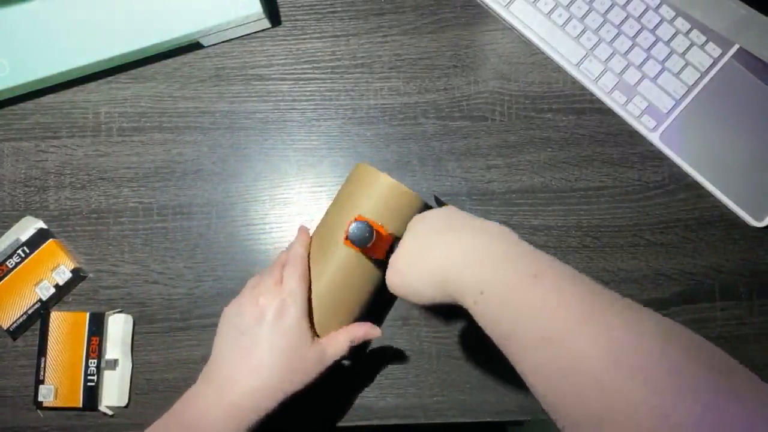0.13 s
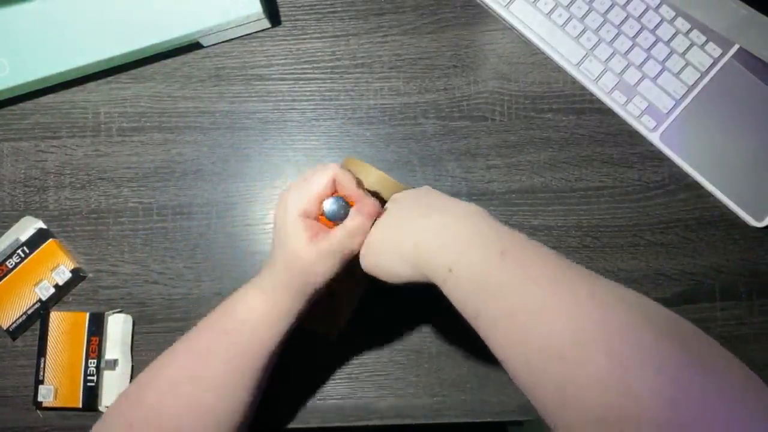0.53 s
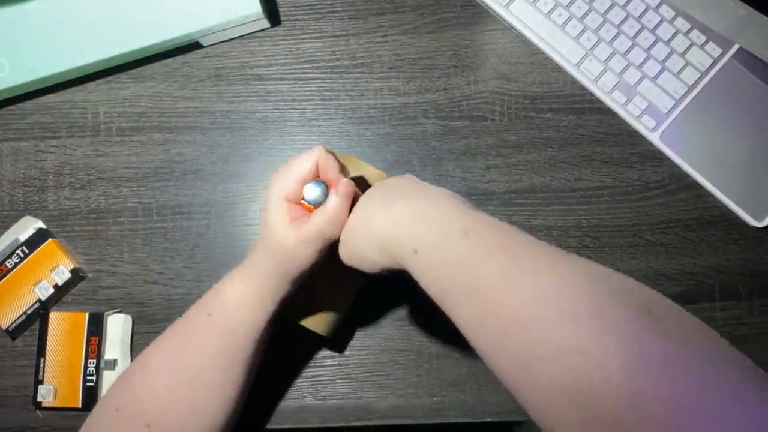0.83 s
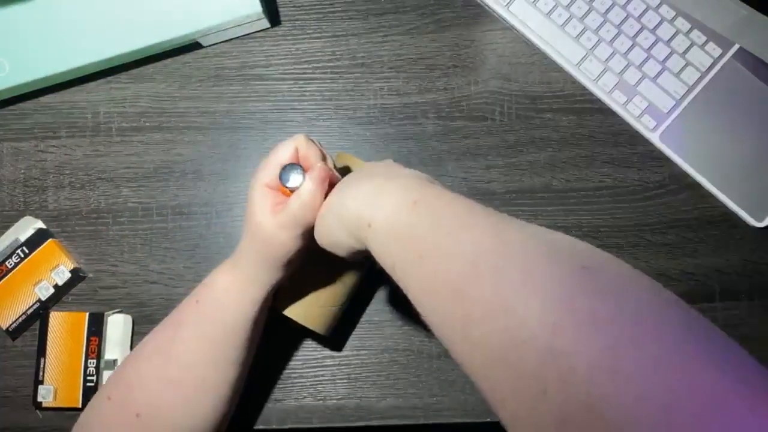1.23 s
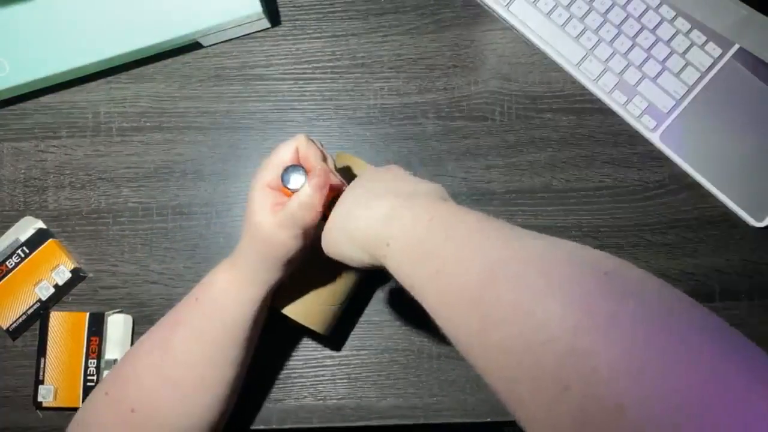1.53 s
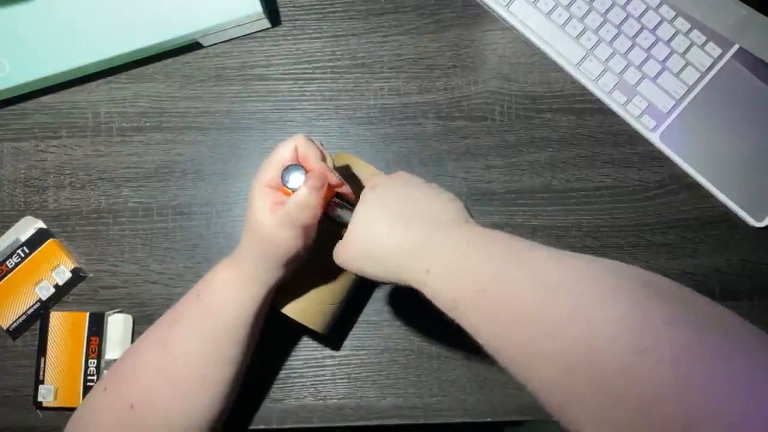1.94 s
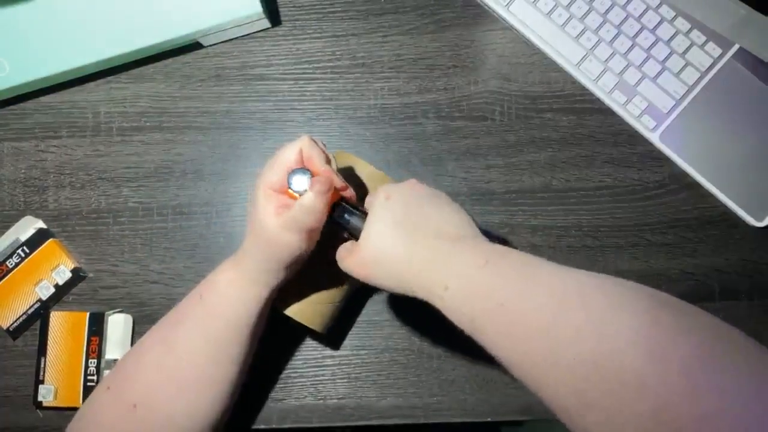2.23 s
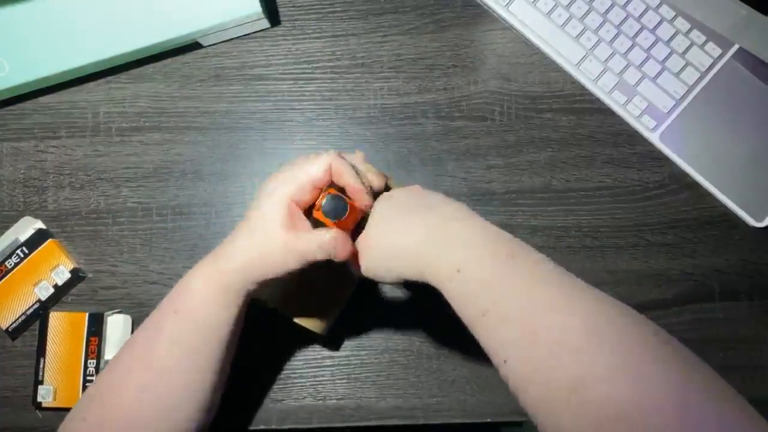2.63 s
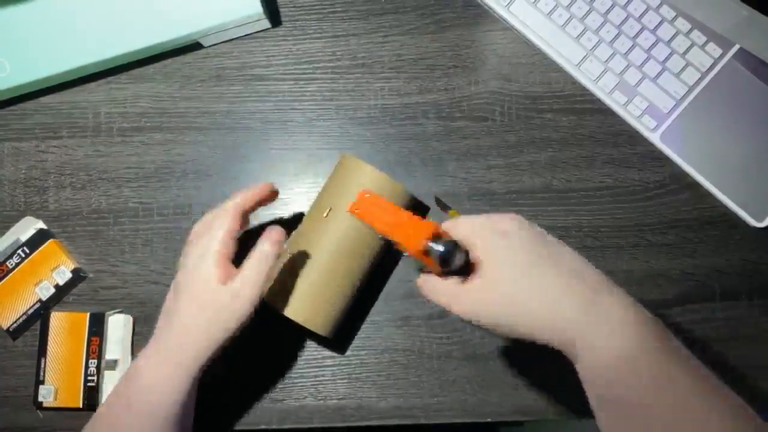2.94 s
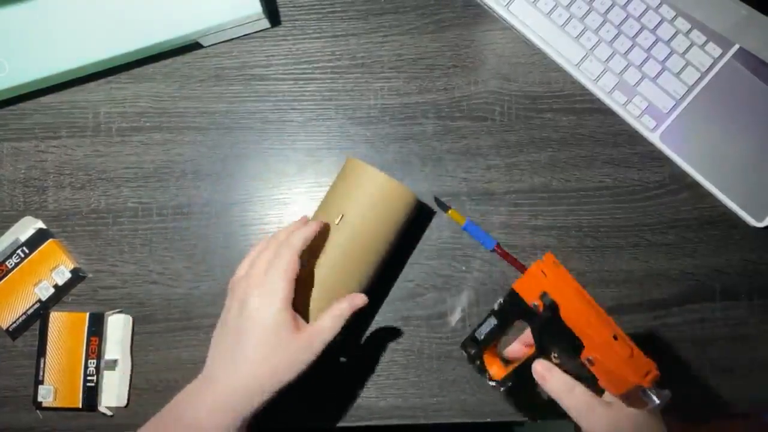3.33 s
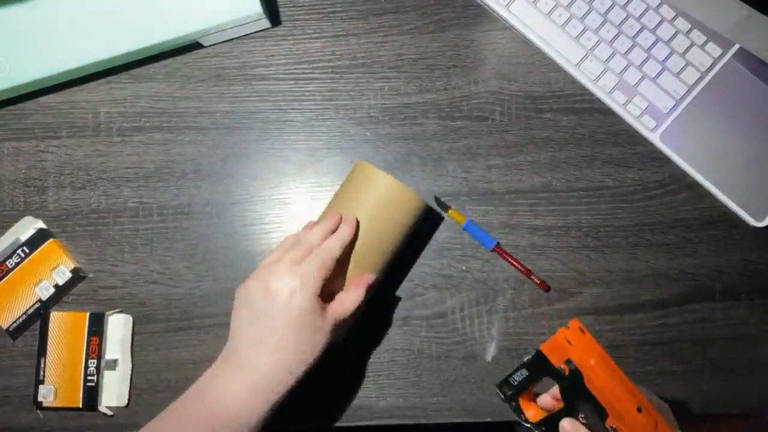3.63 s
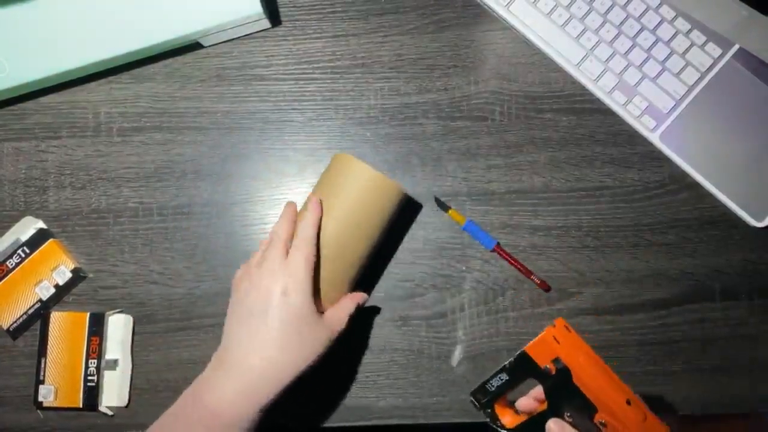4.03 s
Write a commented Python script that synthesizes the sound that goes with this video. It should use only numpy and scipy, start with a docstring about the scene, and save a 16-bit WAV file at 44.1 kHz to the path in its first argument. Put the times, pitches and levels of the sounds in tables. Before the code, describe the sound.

Close desk sounds over a faint fan hum: a hollow knock, creaking lever, one violent metallic staple shot, lighter latch clack, then palm rubbing cardboard.

```python
"""A heavy hand stapler on a thick cardboard tube on a desk: blows and clicks of steel, each noise plus frame modes.
The lever scrapes in stick-slip jerks, the spring trips and rattles, the driver slams a staple into the tube,
and half a second later the lever latches back as a pawl chatters. Damped modes make the tube and desk knock.
Rough noise makes the hand rubs, mostly a palm sliding on the cardboard at the end.
Behind them a fan hums as coloured noise and wavering tones, in a small room with a diffuse tail."""
import sys
import numpy as np
from scipy import signal
from scipy.fft import rfft, irfft, next_fast_len
from scipy.io import wavfile
from scipy.ndimage import map_coordinates

SR = 44100
rng = np.random.default_rng(int(sys.argv[2]) if len(sys.argv) > 2 else 0)


def generate_wav(signal):
    """Clip the signal to [-1, 1] and save it as 16-bit WAV at the path in sys.argv[1]."""
    frames = np.transpose(np.atleast_2d(signal))
    scaled = np.clip(frames, -1, 1) * 32767
    pcm = np.round(scaled).astype(np.int16)
    wavfile.write(sys.argv[1], SR, pcm)


N = 185245

TOP_HZ = 16050  # band limit
# the spring lets go, the driver lands, the hand eases off, the pawl drops home (s)
TRIP, STRIKE, EASE, LATCH = 2.0802, 2.125, 2.412, 2.6186

# Fan air colour: f/Hz, relative level/dB per Hz
FAN_AIR = [(15, -49.5), (25, -29), (59, -3), (92, -6.5), (114, -5), (277, -12.5), (384, -3.5), (416, -7.5),
           (545, -12), (591, -10.5), (988, -18.5), (1700, -25.5), (2110, -26.5), (3160, -31.5), (9000, -54),
           (13000, -59), (16000, -55.5)]
# Fan tones: f/Hz, mean level/dB
FAN_TONES = [(119, -65.5), (210, -76), (339, -71.5), (378, -63.5), (554, -70)]
# Left-right likeness of close sounds: f/Hz, correlation
NEAR = [(200, 1), (1800, 0.61), (2700, 0.86), (4500, 0.64), (8000, 0.74), (15000, 0.35)]
# Left-right likeness of surrounding sounds: f/Hz, correlation
FAR = [(30, 1), (120, 0.68), (300, .88), (600, 0.12), (1200, 0.13), (3000, 0.12), (15000, 0.1)]
# Stereo balance of the desk sounds: f/Hz, left minus right/dB
PAN = [(150, 0), (500, -3), (1500, -0.1), (2800, -4), (4500, -2), (8000, 0.4), (15000, -0.1)]
# Decay of the room: f/Hz, t60/s
ROOM_DECAY = [(100, 0.48), (700, 0.24), (2000, 0.27), (5000, .31), (10000, 0.26), (16000, 0.17)]

# Palm on cardboard, colour: f/Hz, relative level/dB per Hz
SKIN = [(600, -14), (1600, -3.5), (3300, -5), (4400, -0.5), (5200, -4.5), (7000, -3), (9000, -4.5),
        (10000, -7.5), (13000, -11.5), (16000, -3)]
# Palm slides: t/s, length/s, level/dB
BRUSHES = [ (0.0, 0.071, -65.5), (0.15, .005, -62), (3.47, .008, -69.5), (3.497, 0.005, -58),
           (3.575, .02, -74), (3.795, 0.21, -60), (3.83, 0.057, -58.5), (3.955, 0.037, -56.5),
           (4.195, 0.0047, -61)]
# Hand on the handle, colour: f/Hz, relative level/dB per Hz
GRIP = [(600, -9.5), (1200, -0.5), (1700, 5), (2300, -3.5), (4200, -7.5), (6000, -13), (8000, -23),
        (16000, -33)]
# Grip shifts on the handle: t/s, length/s, level/dB
SHIFTS = [ (0.1, 0.1, -64.5), (0.3, 0.26, -71.5), (1.38, 0.31, -65.5), (2.51, 0.037, -52.5),
          (3.3, 0.16, -68), (3.5, 0.1, -61.5)]
# Lever scrape colour: f/Hz, relative level/dB per Hz
LEVER_SCRAPE = [(450, -21.5), (700, 7.5), (950, -15.5), (1500, -9.5), (2000, 6), (2400, -4), (2750, 2.5),
                (3400, -11.5), (4400, -17), (6000, -16), (10000, -28), (16000, -28)]
# Lever slips, in jerks going down and once coming up: t/s, length/s, level/dB
SLIPS = [ (1.41, 0.08, -68.5), (1.58, 0.14, -62.5), (1.785, .012, -56.5), (1.812, 0.0067, -46.5),
         (1.845, 0.018, -49), (1.915, 0.02, -55.5), (1.996, 0.026, -47.5), (2.074, .005, -43),
         (2.605, 0.011, -45.5)]

# Blows through the tube into the desk; the tube rings higher the harder it is pressed: t/s, tube level/dB,
# tube pitch/ratio, desk level/dB, desk lag/s, desk swell/s, desk ring length/ratio, contact time/ms
KNOCKS = [ (0.011, -20.5, .6, -23, 0.0081, 0.0052, 1.1, 1.28),
          (0.521, -49.5, .59, -49, 0.0024, .003, 1, 2.7), (1.8019, -31, 1.06, -50, 0.0044, .002, 1, 0.6),
          (1.997, -44, 1.03, -60, 0.0027, .002, 0.63, 0.51),
          (2.081, -32, 0.93, -38, 0.0022, .001, .6, 0.26),
          (2.1285, -11.5, 1.014, -12, .003, 0.0012, 0.57, 0.39),
          (2.366, -29, 1.06, -31, .005, 0.0088, .85, 0.35),
          (2.589, -39.5, .84, -46, .0048, .002, 0.91, 0.62),
          (2.6242, -24, .84, -32, 0.0058, .002, 0.99, 0.8), (3.155, -58, .6, -46, .002, .002, .7, 3.8),
          (3.490, -48, .7, -45, .003, 0.0039, 1.14, 1.74)]
# Cardboard tube modes before the pitch ratio: f/Hz, relative level/dB, t60/s
TUBE_MODES = [(345, -19, .07), (459.4, -17, .05), (560.6, -8.5, 0.042), (632, -8.5, .1), (639, 2, .022),
              (727, -7.5, .03), (830, -12.5, .06), (1201, -13, 0.011)]
# Desk modes before leaning alters them: f/Hz, relative level/dB, t60/s
DESK_MODES = [(57.6, -6.5, .25), (117.5, -0.5, .18), (150, -7, 0.091), (197, -7, .13), (320, -16.5, 0.18),
              (404.8, -21, .11)]
# Dull crunch of cardboard, colour: f/Hz, relative level/dB per Hz
BOARD = [(60, -23.5), (130, -7.5), (330, -5.5), (450, -5), (640, -2), (800, -4.5), (1050, -11),
         (1400, -11.5), (3000, -26.5), (8000, -53.5)]
# Shudder of the desk top, colour: f/Hz, relative level/dB per Hz
THUD = [(20, -56), (50, -18), (100, -2), (150, 1), (260, -5), (400, -14), (1500, -47.5), (6000, -88)]

# Drive spring modes, jolted as the driver lands: f/Hz, relative level/dB, t60/s
SPRING_MODES = [(2170, 3, 0.083), (2720, 0.5, 0.14), (2870, 0.5, 0.1), (2860, -0.5, 0.11), (3060, 1, 0.15),
                (3620, -7, .2), (4450, 1.5, 0.17), (5020, 0.5, 0.13), (7124, -4, .17), (7838, -5, .14),
                (9090, -3, .12)]
# Rattling coils, colour: f/Hz, relative level/dB per Hz
COILS = [(900, -24), (1400, -9), (2200, 0.5), (2700, -1.5), (3400, 3), (4500, -0.5), (6000, -3),
         (8000, -12.5), (10000, -24.5), (15600, -20.5), (17000, -43.5)]
# Modes of the pawl that catches the returning driver: f/Hz, relative level/dB, t60/s
PAWL_MODES = [(1510, 0, 0.034), (1860, 1.5, 0.044), (2480, -4.5, 0.058), (2800, 0, .06), (3460, -11.5, .13),
              (3970, 1.5, 0.07), (4060, -10.5, .11), (5480, -1.5, .045), (6780, -17, .08),
              (7625, -16.5, .13), (8690, -8, .05), (10745, -14, .1)]
# Pawl landing and chatter: t/s, ring level/dB, tick level/dB, loss of low modes/dB per octave below the knee
PAWL_TOUCHES = [(2.6185, -25, -22.5, -0.5), (2.636, -33.5, -37, 12), (2.644, -37, -35.5, 15),
                (2.668, -53, -41.5, 10)]

# Steel frame modes: f/Hz, relative level/dB, t60/s
FRAME_MODES = [(1264, -6.5, .05), (1753, 1.5, .035), (1903, -1.5, .04), (2242, 2.5, 0.05),
               (2603, -5.5, .12), (2780, -13, 0.1), (4320, -5, .1), (5100, -9.5, 0.11), (5350, -10, 0.12),
               (6597, -10.5, .08), (7305, -14.5, .07), (8170, -6.5, 0.024), (8890, -6.5, 0.055),
               (15246, -19, .11)]
# Crack of steel, colour: f/Hz, relative level/dB per Hz
CRACK = [(300, -27), (950, -20.5), (1250, -1.5), (1450, -6), (1800, -1), (2200, -3), (2800, -1),
         (3350, -2.5), (4300, -0.5), (5900, -4.5), (8800, -5.5), (10500, -12), (15600, -11.5), (17000, -38)]
# Clack of the returning lever, colour: f/Hz, relative level/dB per Hz
CLACK = [(300, -26), (1000, -16.5), (1450, 0), (2100, -3.5), (2800, 3.5), (3200, -4), (4100, 0),
         (5500, -3.5), (5850, -9), (6400, -5.5), (10500, -5.5), (12000, -11), (15600, -8.5), (17000, -33.5)]
# Heavy steel blows: t/s, colour, level/dB, brightness/dB per octave, ring/dB re level,
# rebound/dB re level, rebound brightness/dB per octave
BLOWS = [ (TRIP, CRACK, -11, -2.5, -4.5, 3.1, 3.7), (STRIKE, CRACK, -8, -.5, -19.5, -1.9, -3.5),
         (LATCH, CLACK, -10.5, 0.87, -32, -10.5, 0)]
# Light clicks of loose steel parts: t/s, level/dB, brightness/dB per octave, t60/s
CLICKS = [ (0.278, -40, -2, 0.02), (0.451, -49.5, -8, 0.034), (1.011, -44, 15.5, .018),
          (1.268, -52.5, -2, 0.024), (1.8006, -37, -3.5, 0.042), (1.8076, -36, -3, 0.026),
          (1.812, -41, -4, 0.03), (1.849, -46, -5, .03), (1.9955, -36, -8.5, 0.0051),
          (2.013, -44, -5.5, .014), (2.153, -33, -2.5, 0.02), (2.168, -39, -1, .025),
          (2.186, -44, -2.5, .025), (2.366, -42, -5.5, 0.031), (2.514, -43.5, -2, 0.018),
          (2.586, -31, -5.5, 0.055), (4.128, -53, 9, 0.039)]


def amp(db):
    """Decibels to gain."""
    return 10 ** (np.asarray(db) / 20)


def unit(x):
    """Scale to rms 1."""
    return x / np.sqrt(np.mean(x ** 2) + 1e-20)


def along(points, hz):
    """(Hz, value) points read on a log frequency axis."""
    f, v = np.transpose(points)
    return np.interp(np.log(hz + 1), np.log(f + 1), v)


def clock(size=N):
    """Seconds for each sample."""
    return np.arange(size) / SR


def fade(t, t60):
    """Exponential decay, 60 dB in t60."""
    return np.exp(-np.log(1000) * t / t60)


def wobble(rate):
    """A smooth random curve, rate knots a second."""
    knots = rng.standard_normal(int(N * rate / SR) + 4)
    return map_coordinates(knots, [clock() * rate])


def filtered(x, response):
    """Shape the spectrum of x by a response of frequency."""
    size = x.shape[-1]
    m = next_fast_len(size + 8192)
    return irfft(rfft(x, m) * response(np.fft.rfftfreq(m, 1 / SR)), m)[..., :size]


def noise(spectrum, alike, size=N, tilt_db=0, ripple_db=0, spacing=70):
    """Stereo noise of rms 1 with a given colour and likeness; a fresh random ripple makes its spectrum uneven."""
    knots = rng.standard_normal(1024)  # one every `spacing` Hz

    def colour(hz):
        ripple = ripple_db * np.interp(hz / spacing, np.arange(len(knots)), knots) * np.clip(hz / 4000, 0, 1)
        tilt = tilt_db * np.log2(np.maximum(hz, 800))  # dB per octave, above 800 Hz
        return amp(along(spectrum, hz) + ripple + tilt)

    def mid_side(hz):
        turn = np.arccos(np.clip(along(alike, hz), -1, 1)) / 2
        return colour(hz) * [np.cos(turn), np.sin(turn)]

    mid, side = filtered(rng.standard_normal((2, size)), mid_side)
    return unit(np.array([mid + side, mid - side]))


def ring(modes, scatter_db, spread, size=SR // 2, together_hz=2000):
    """Damped modes with scattered strengths; only the high ones reach the two ears out of step."""
    t, out = clock(size), np.zeros((2, size))
    for k, (hz, db, t60) in enumerate(modes):
        chance = rng.standard_normal(3)
        phase = spread * max(hz - together_hz, 0) / TOP_HZ * chance[1:, None]
        strength = (-1) ** k * amp(db + scatter_db * chance[0])
        out += strength * fade(t, t60) * np.sin(2 * np.pi * hz * t + phase)
    return out


def add(track, s, sound):
    """Mix a sound into a track at time s."""
    part = track[:, max(round(s * SR), 0):][:, :sound.shape[-1]]
    part += sound[..., :part.shape[-1]]


def rubs(rows, rise_db_per_s, fall_db_per_s):
    """Gain of rubbing strokes: each swells ahead of its start, holds for its length and dies away."""
    t, gain = clock(), 0
    for s, length, db in rows:
        swell = rise_db_per_s * np.maximum(s - t, 0)
        decay = fall_db_per_s * np.maximum(t - s - length, 0)
        gain = gain + amp(db - swell - decay)
    return gain


def fan(air_db=-53.5, waver=1.0):
    """Steady air noise with a few tones that waver in level and phase."""
    t, tones = clock(), 0
    for hz, db in FAN_TONES:
        level = np.sqrt(2) * amp(db + 2.5 * wobble(5.4))
        tones = tones + level * np.sin(2 * np.pi * hz * t + waver * wobble(11))
    return amp(air_db) * noise(FAN_AIR, FAR) + tones


def room(x, delay=0.0039, build=0.0018):
    """Near walls answer after a short delay (s) with a diffuse tail whose decay depends on frequency."""
    white = noise([(20, 0), (20000, 0)], FAR, size=SR // 2)
    hz, t, z = signal.stft(white, SR, nperseg=256)
    tail = signal.istft(z * fade(t, along(ROOM_DECAY, hz)[:, None]), SR, nperseg=256)[1]
    tail = tail * np.clip((clock(tail.shape[1]) - delay) / build, 0, 1)
    return signal.fftconvolve(x, tail / np.linalg.norm(tail[0]), axes=1)[:, :N]


def knocks(crunch_db=-8.5, crunch_t60=0.055, shudder_db=-17, shudder_t60=0.23,
           pressed_db=15, pressed_hz=170, stiffen=.22):
    """The tube knocks hollowly, then the desk top swells into a thud; soft contacts excite only low modes.
    A desk that is leaned on rings shorter and higher and loses its bass."""
    out, t = np.zeros((2, N)), clock(SR // 2)
    for s, tube_db, pitch, desk_db, lag, swell, sustain, contact_ms in KNOCKS:
        # a longer push smooths away the treble
        u = clock(SR // 20) * 1e3 / max(contact_ms, .05)
        push = u * np.exp(-2 * np.pi * u)
        felt = lambda x: signal.fftconvolve(x, push[None] / push.sum(), axes=1)

        tube = [(hz * pitch, db, t60) for hz, db, t60 in TUBE_MODES]
        crunch = amp(crunch_db) * fade(t, crunch_t60) * noise(BOARD, NEAR, size=len(t))
        add(out, s, amp(tube_db) * felt(crunch + ring(tube, scatter_db=.5, spread=0)))

        lean = 1 - sustain
        desk = []
        for hz, db, t60 in DESK_MODES:
            bass_db = pressed_db * lean * min(np.log2(hz / pressed_hz), 0)
            desk.append((hz * (1 + stiffen * lean), db + bass_db, t60 * sustain))
        shudder = amp(shudder_db) * fade(t, shudder_t60 * sustain) * noise(THUD, NEAR, size=len(t))
        onset = 1 - np.exp(-t / max(swell, 1 / SR))
        thud = onset * (shudder + ring(desk, scatter_db=1.5, spread=0))
        add(out, s + lag, amp(desk_db) * felt(thud))
    return out


def hands(palm_grain_db=2.0, grip_grain_db=2.0):
    """Friction noise with a random grain: the palm brushes the cardboard, the other hand shifts on the handle."""
    palm = rubs(BRUSHES, rise_db_per_s=480, fall_db_per_s=292) * noise(SKIN, NEAR, ripple_db=4.0)
    grip = rubs(SHIFTS, rise_db_per_s=227.5, fall_db_per_s=199.5) * noise(GRIP, NEAR, ripple_db=4.0)
    palm_grain = unit(amp(palm_grain_db * wobble(200)))
    grip_grain = unit(amp(grip_grain_db * wobble(200)))
    return palm_grain * palm + grip_grain * grip


def lever(slips_per_s=380, scatter_db=2.0, slip_t60=0.016):
    """The lever sticks and slips on its pivot: a crackle of tiny, unevenly spaced jerks."""
    count = 4096  # enough to outlast the scene
    times = np.cumsum(rng.uniform(.3, 1.7, count)) / slips_per_s
    strengths = amp(scatter_db * rng.standard_normal(count))
    jerks = np.bincount((times * SR).astype(int), strengths, N)[:N]
    crackle = unit(signal.fftconvolve(jerks, fade(clock(SR // 10), slip_t60))[:N])
    strokes = rubs(SLIPS, rise_db_per_s=949, fall_db_per_s=751.5)
    return strokes * crackle * noise(LEVER_SCRAPE, NEAR, ripple_db=2.5)


def spring(buzz_db=-30.5, buzz_t60=0.14, rattle_db=2.0, ring_db=-34,
           sing_db=-46, sing_t60=1.6, damped_t60=0.33):
    """The coils rattle until the driver lands, ring with the jolt, then sing on faintly; the easing hand damps them."""
    t = clock()
    since = lambda s: np.maximum(t - s, 0)
    rattle = unit(amp(rattle_db * wobble(260)))
    buzz = amp(buzz_db) * fade(since(STRIKE), buzz_t60) * rattle
    buzz = buzz * noise(COILS, NEAR, ripple_db=1.5, spacing=43)
    sing = amp(sing_db) * fade(since(TRIP), sing_t60) * fade(since(EASE), damped_t60)
    sing = sing * noise(COILS, FAR, tilt_db=2.0, ripple_db=2.0)
    out = (t > TRIP) * (buzz + sing)
    add(out, STRIKE, amp(ring_db) * ring(SPRING_MODES, scatter_db=1.0, spread=4.0))
    return out


def pawl(rise=.0006, spread=4.0, tick_t60=0.055, knee_hz=3900):
    """The pawl drops home and chatters on its seat; each touch ticks and rings it anew."""
    out, t = np.zeros((2, N)), clock(SR // 2)
    attack = 1 - np.exp(-t / rise)
    for s, ring_db, tick_db, loss_db in PAWL_TOUCHES:
        modes = [(hz, db + loss_db * min(np.log2(hz / knee_hz), 0), t60) for hz, db, t60 in PAWL_MODES]
        tick = amp(tick_db) * fade(t, tick_t60) * noise(CLACK, NEAR, size=len(t), ripple_db=4.5)
        add(out, s, attack * (tick + amp(ring_db) * ring(modes, scatter_db=1.5, spread=spread)))
    return out


def contacts(blow_t60=.028, rebound_s=.0036, rebound_ring_db=-24.5,
             graze_s=.0035, graze_db=-18.5, graze_t60=0.017, click_ring_db=-23, ring_per_brightness=-0.9):
    """Touches of steel as (s, colour, dB, t60, brightness, ring dB): a blow grazes, hits, rebounds; a click is one."""
    for s, colour, db, tilt_db, ring_db, rebound_db, rebound_tilt_db in BLOWS:
        yield s - graze_s, colour, db + graze_db, graze_t60, tilt_db, click_ring_db
        yield s, colour, db, blow_t60, tilt_db, ring_db
        yield s + rebound_s, colour, db + rebound_db, blow_t60, rebound_tilt_db, rebound_ring_db
    for s, db, tilt_db, t60 in CLICKS:
        # duller clicks ring the frame more
        yield s, CRACK, db, t60, tilt_db, click_ring_db + ring_per_brightness * tilt_db


def steel(rise=0.00073, spread=5.5):
    """Each contact is a dense crack plus the ring of the frame."""
    out, t = np.zeros((2, N)), clock(SR // 2)
    attack = 1 - np.exp(-t / rise)
    for s, colour, db, t60, tilt_db, ring_db in contacts():
        crack = noise(colour, NEAR, size=len(t), tilt_db=tilt_db, ripple_db=5.0) * fade(t, t60)
        frame = amp(ring_db) * ring(FRAME_MODES, scatter_db=0.0, spread=spread)
        add(out, s, amp(db) * attack * (crack + frame))
    return out


def scene(wet_db=-11.5, lead=.000022, bass_hz=220):
    """The desk sounds reach the left microphone first, by lead (s); the room returns little bass; the fan runs on."""
    desk = knocks() + hands() + lever() + spring() + pawl() + steel()
    sides = np.array([[.5], [-.5]])  # left, right
    direct = filtered(desk, lambda hz: amp(sides * along(PAN, hz)) * np.exp(2j * np.pi * hz * lead * sides))
    walls = filtered(room(desk), lambda hz: hz / np.hypot(hz, bass_hz))
    return fan() + amp(wet_db) * walls + direct


def record(dry):
    """A 300 Hz wide slope centred on the band limit removes the treble above it."""
    return filtered(dry, lambda hz: np.clip((TOP_HZ - hz) / 300 + .5, 0, 1))


dry = scene()
out = record(dry)
generate_wav(out)
```